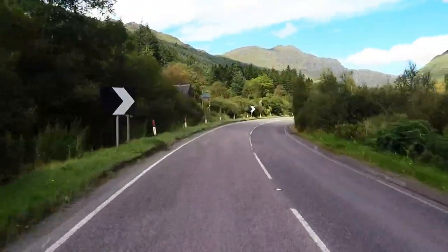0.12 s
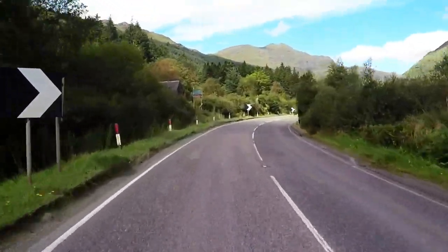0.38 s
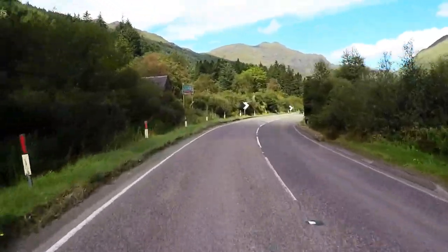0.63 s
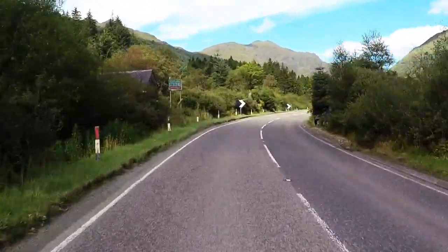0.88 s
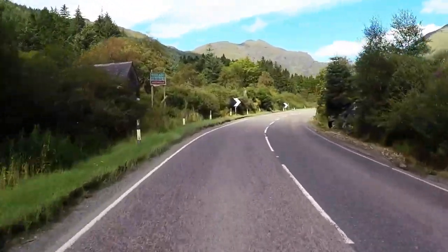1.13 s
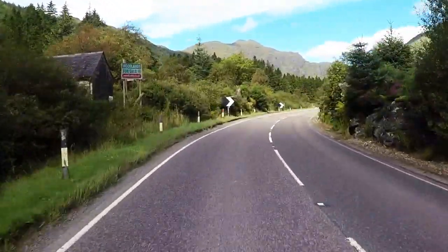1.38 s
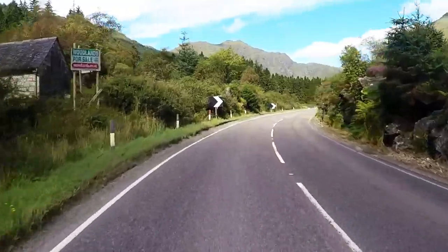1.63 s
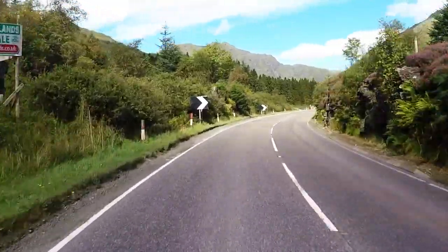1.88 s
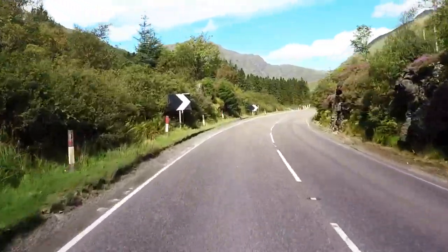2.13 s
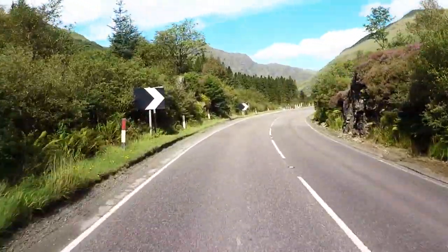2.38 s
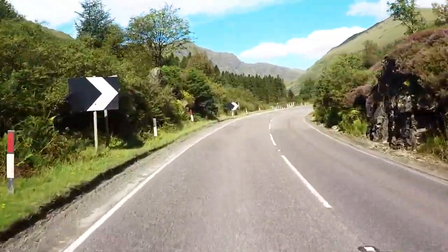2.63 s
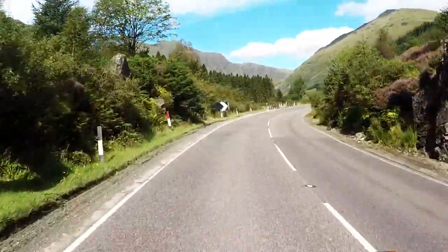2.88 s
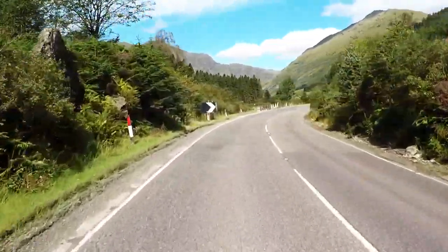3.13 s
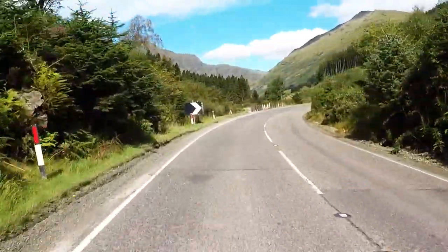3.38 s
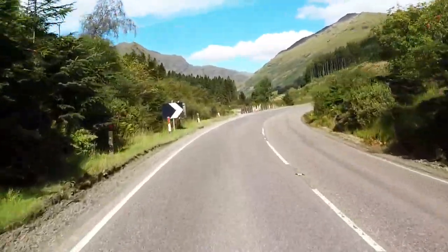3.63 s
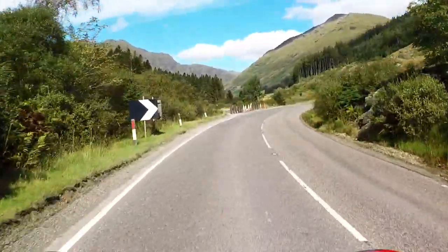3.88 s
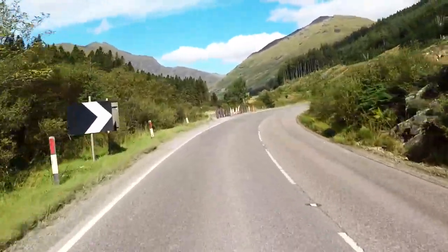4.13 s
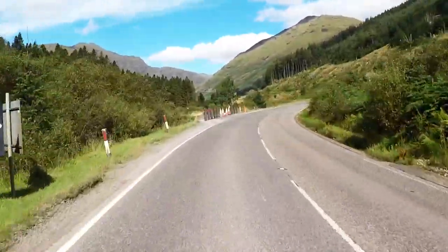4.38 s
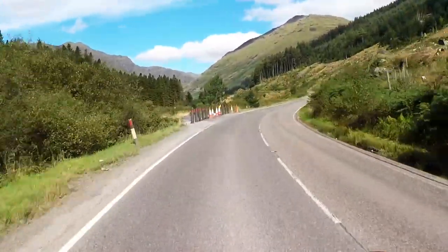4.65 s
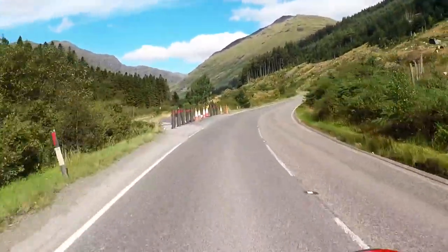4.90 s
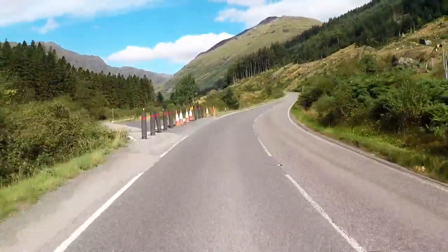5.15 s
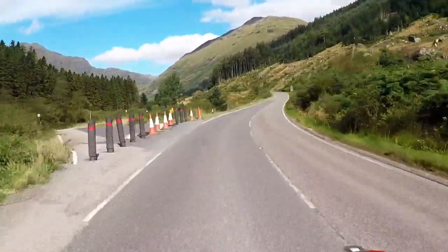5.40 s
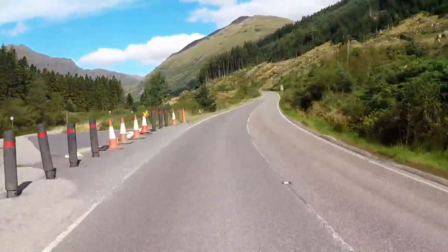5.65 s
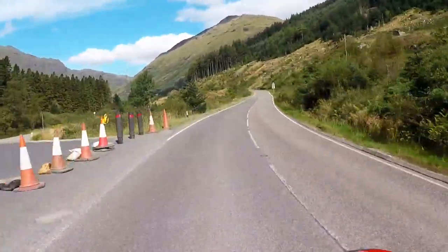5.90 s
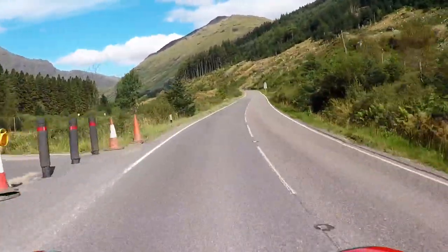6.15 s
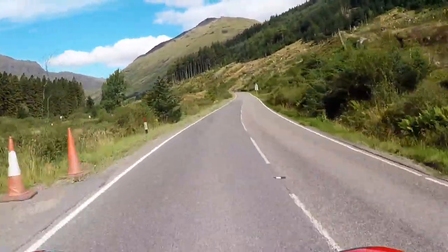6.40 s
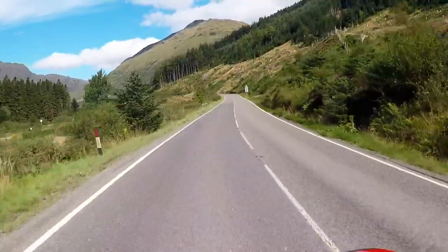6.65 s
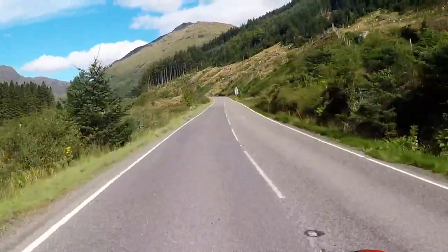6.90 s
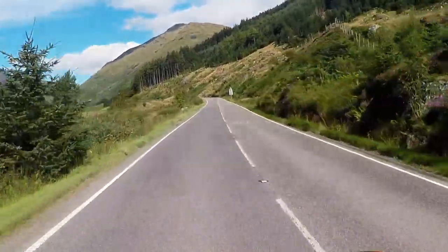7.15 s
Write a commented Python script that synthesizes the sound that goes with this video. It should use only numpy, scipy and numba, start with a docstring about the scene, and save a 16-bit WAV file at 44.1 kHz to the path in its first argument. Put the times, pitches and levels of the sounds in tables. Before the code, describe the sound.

Wind overload from start to finish: deep, uneven thumps push the microphone close to distortion, and brief tearing bursts crack through, some followed by a sucking low pulse. Tyre roar is buried in the dull rush beneath. Fine crackle and weak hiss add grit. The car moves steadily outdoors; the close, mono sound is squeezed in level, with a rougher, fuller second half.

```python
"""Wind on an open car

A small camera rides on an open car along a country road, its microphone in the full airstream.
Big eddies thump the diaphragm as low noise; small ones tear past the port as short ripping noise bursts,
the strongest with a snap and a pull of suction. The port hisses and tiny ticks make the rush gritty.
Tyre roar shares the rushing noise underneath, and a quick gain control holds the loud moments down."""
import sys
import numpy as np
from scipy import signal
from scipy.fft import rfft, irfft, next_fast_len
from scipy.io import wavfile
from scipy.ndimage import uniform_filter1d
from numba import njit

SR = 44100
rng = np.random.default_rng(int(sys.argv[2]) if len(sys.argv) > 2 else 0)


def undo_db(level):
    """Turn decibels back into plain size, where 20 dB means ten times bigger."""
    steps = np.asarray(level, float) / 20
    return 10 ** steps


def output_pcm(signal):
    """Save a mono or channel-first signal as 16-bit PCM at the path in sys.argv[1].

    Samples are clipped to [-1, 1] before scaling.
    """
    pcm = np.clip(np.atleast_2d(signal).T, -1, 1) * 32767
    wavfile.write(sys.argv[1], SR, np.round(pcm).astype(np.int16))


N = 320607
TIME = np.arange(N) / SR


def level(x, db):
    """Scale to an rms level in dB."""
    return x * undo_db(db) / np.sqrt(np.mean(x ** 2))


def noise(colour):
    """Noise of rms 1 whose spectrum runs through (Hz, dB) points."""
    hz, db = np.transpose(colour)
    size = next_fast_len(N)
    log_hz = np.log(np.arange(size // 2 + 1) * SR / size + 1)
    gain = undo_db(np.interp(log_hz, np.log(hz), db))
    return level(irfft(rfft(rng.standard_normal(size)) * gain, size)[:N], 0)


def walk(rate_hz):
    """Random levels held for 1 / rate_hz seconds, then smoothed twice; rms 1."""
    hold = int(SR / rate_hz)
    steps = np.repeat(rng.standard_normal(N // hold + 1), hold)
    return level(uniform_filter1d(uniform_filter1d(steps, hold), hold)[:N], 0)


def octaves(x, wander_db, low_hz, count):
    """Split into crossfading octave bands; each takes the dB curve that wander_db(octave) gives it."""
    size = next_fast_len(N)
    hz = np.arange(size // 2 + 1) * SR / size + 1
    place = np.clip(np.log2(hz / low_hz), 0, count - 1)
    spectrum = rfft(x, size)
    out = np.zeros(N)
    for k in range(count):
        band = irfft(spectrum * np.clip(1 - abs(place - k), 0, 1), size)[:N]
        out += undo_db(wander_db(k)) * band
    return out


def steady(x, share, span_s):
    """Even out the chance swells of a noise by a share of 0-1."""
    span = int(span_s * SR)
    power = uniform_filter1d(uniform_filter1d(x ** 2, span), span)
    return x * (x.std() / np.sqrt(power + 1e-9)) ** share


def puffs(rows, rise_s):
    """Envelope of (start s, dB, length s) puffs: a quick rise, a short hold, a soft end."""
    out = np.zeros(N)
    for s, db, length in rows:
        t = np.arange(int(3 * length * SR) + 2) / SR
        start = max(int((s - rise_s) * SR), 0)
        shape = undo_db(db) * (1 - np.exp(-t / rise_s)) * np.exp(-(t / length) ** 2)
        out[start:start + len(t)] += shape[:N - start]
    return out


def snaps(s, db, hz):
    """The front of an eddy kicks the diaphragm: one short damped swing, in or out."""
    kicks = np.zeros(N)
    kicks[(s * SR).astype(int)] = undo_db(db) * rng.choice([-1, 1], len(s))
    t = np.arange(400) / SR
    ring_s = 0.4 / hz  # the swing fades within about a cycle
    swing = np.sin(2 * np.pi * hz * t) * t / ring_s * np.exp(1 - t / ring_s)
    return signal.fftconvolve(kicks, swing)[:N]


# Colour of turbulence and tyre roar. Each row: frequency in Hz, relative density in dB per Hz.
RUSH_COLOUR = [(88, -35.5), (150, -9.5), (216, -9), (574, -18), (1100, -20), (1620, -22), (2300, -28),
               (3000, -38.5), (3900, -55.5), (6600, -120)]


def rush(db, surge_db):
    """Turbulence and tyre roar: octaves share the surges of the stream and flicker alone."""
    surge_share = (0.95, 1.0, 1.0, 0.56, 0.056)
    swell_share = (1.2, 1.2, 1.1, 0.93, 0.15)  # the lower octaves swell most
    flicker_db = 1.8  # each octave's own quick wavering

    def wander_db(k):
        swell_db = swell_share[k] * (db - db.mean())
        return swell_db + surge_share[k] * surge_db + flicker_db * walk(45)

    return undo_db(db.mean() + 0.3) * octaves(noise(RUSH_COLOUR), wander_db, 210, count=5)


# Colour of the air at the port. Each row: frequency in Hz, relative density in dB per Hz.
HISS_COLOUR = [(1650, -26.5), (2800, -3), (4060, 1.5), (5020, -1.5), (6760, -12), (9050, -25),
               (9960, -30.5), (12900, -54), (21900, -120)]


def hiss(db, surge_db):
    """Air whistling broadly over the port, lifted a little by every surge."""
    air = octaves(noise(HISS_COLOUR), lambda k: 0.32 * surge_db + 1.13 * walk(30), 3600, count=2)
    return undo_db(db) * level(air, 0)


# Pitches of the tiny ticks. Each entry: frequency of the damped swing in Hz.
TICK_HZ = (650, 1000, 1500, 2000)


def crackle(rush_db):
    """Thousands of the tiniest eddies tick past the port: the smaller, the higher and weaker the tick."""
    scatter_db, most_db = 3.5, 9  # level over the rush: mean before the cap, and the cap
    chance = rng.random((2500, 2)).T
    s = chance[0] * (N - 1) / SR
    over_db = np.minimum(-scatter_db * np.log(1 - chance[1]), most_db)
    db = np.interp(s, TIME, rush_db) + over_db
    out, kinds = np.zeros(N), len(TICK_HZ)
    for k, hz in enumerate(TICK_HZ):
        out += TICK_HZ[1] / hz * snaps(s[k::kinds], db[k::kinds], hz)
    return out


# Colour of the large eddies. Each row: frequency in Hz, relative density in dB per Hz.
BUFFET_COLOUR = [(8.8, -38), (15, -0.5), (38, 3.5), (80, 0.5), (117, -1), (166, -12), (300, -20.5),
                 (390, -25), (660, -120)]


def buffet(db, flutter_db):
    """Large eddies push the diaphragm to and fro; its travel stiffens at the ends."""
    push = octaves(noise(BUFFET_COLOUR), lambda k: k * flutter_db, 80, count=2)
    # the largest vortices are shed one after another at a nearly even size
    deep = signal.sosfiltfilt(signal.butter(2, 42, fs=SR, output="sos"), push)
    push = steady(push - deep, 0.3, 0.12) + steady(deep, 0.39, 0.034)
    stiffness = 0.155
    return undo_db(db) * level(np.tanh(push * stiffness), 0)


def suction(s, db, lag_s):
    """Behind each strong eddy the pressure drops sharply, then swings back slowly."""
    pull_db, most_db = 13, -2  # pull over the eddy's tearing, and its ceiling
    width_s, rebound_share = 0.0017, 0.62
    deepest_s = s + lag_s * rng.uniform(0.7, 1.3, len(s))
    kicks = np.zeros(N)
    kicks[((deepest_s - 3 * width_s) * SR).astype(int)] = undo_db(np.minimum(db + pull_db, most_db))
    t = np.arange(2000) / SR / width_s - 3  # in widths from the deepest pull
    pull = np.exp(-t ** 2 / 2)
    back = np.maximum(t - 1, 0) / 2.5
    rebound = rebound_share * back * np.exp(1 - back ** 1.5)
    return signal.fftconvolve(kicks, rebound - pull)[:N]


def faint_eddies(rush_db):
    """Envelope of a dense stream of fainter eddies that follows the rush."""
    count = 700
    chance = rng.random((count, 3)).T
    when = (np.arange(count) + 2 * chance[0]) / (count + 2) * N / SR
    size_db = np.interp(when, TIME, rush_db) + 3.0 + 7 * chance[1] ** 2
    length_s = 0.003 + 0.006 * chance[2]
    return puffs(zip(when, size_db, length_s), 0.0014)


# Colour of the ripping air. Each row: frequency in Hz, relative density in dB per Hz.
RIP_COLOUR = [(50, -6.5), (130, 20.5), (400, 3.5), (1000, -14), (2000, -24.5), (2900, -39), (4500, -38.5),
              (9000, -70)]
# The strongest small eddies. Each row: start in seconds, level in dB of the tearing (above about 700 Hz),
# level in dB of the thud below it relative to the tearing, length of the thud in seconds.
STRONG_EDDIES = [(0.129, -21, 7, 0.013), (0.31, -19.5, 4.5, 0.0073), (0.326, -11.5, 1, 0.011),
                 (0.403, -12.5, -7.5, 0.0063), (0.429, -25.5, -9, 0.039), (0.481, -21.5, 4, 0.013),
                 (0.66, -26.5, -12, 0.02), (0.698, -24, -7, 0.01), (0.745, -11, -9, 0.012),
                 (0.779, -24.5, -14, 0.018), (0.828, -18.5, 0, 0.012), (0.883, -20.5, 0, 0.005),
                 (1.087, -14.5, 4, 0.016), (1.114, -12.5, 0.5, 0.014), (1.179, -20.5, 0, 0.011),
                 (1.23, -26, -11, 0.036), (1.311, -21, 1.5, 0.036), (1.394, -15.5, -5.5, 0.0069),
                 (1.439, -15.5, -7, 0.0071), (1.582, -23, 2, 0.051), (1.639, -22.5, 5, 0.016),
                 (1.875, -12, -1, 0.0072), (1.979, -19.5, -11, 0.0084), (2.049, -21, 2, 0.015),
                 (2.103, -18, 0, 0.017), (2.132, -12.5, 2, 0.006), (2.195, -16, 2.5, 0.013),
                 (2.273, -19.5, -2.5, 0.01), (2.289, -15, 7.5, 0.017), (2.325, -10, 8, 0.0052),
                 (2.378, -23.5, -7, 0.018), (2.476, -12.5, -2, 0.011), (2.646, -14, 8.5, 0.0068),
                 (2.695, -22, 5, 0.038), (2.762, -14, 0.5, 0.014), (2.857, -18, 0, 0.0066),
                 (2.884, -18.5, -3, 0.019), (2.928, -23.5, 0, 0.017), (3.066, -25.5, -12, 0.032),
                 (3.201, -18.5, 5, 0.016), (3.236, -11.5, -1.5, 0.015), (3.363, -15, -3, 0.022),
                 (3.671, -13.5, 4, 0.011), (3.819, -16, -13, 0.0072), (3.883, -24, -11, 0.0045),
                 (3.911, -27.5, -14, 0.022), (3.958, -22, -35, 0.015), (4.017, -14.5, -12, 0.0061),
                 (4.311, -13.5, -4, 0.007), (4.484, -27, 0, 0.018), (4.591, -11.5, -5, 0.01),
                 (4.663, -20, -3, 0.01), (4.673, -22.5, -8, 0.0058), (4.7, -11.5, -5.5, 0.014),
                 (4.732, -9.5, -3.5, 0.0022), (4.798, -23.5, -3, 0.01), (4.812, -25.5, 1, 0.02),
                 (4.837, -22, -4, 0.0085), (4.863, -17.5, -1, 0.008), (4.918, -22, -3, 0.015),
                 (4.963, -13.5, 0.5, 0.0072), (5.11, -18.5, 6, 0.02), (5.164, -20.5, -9.5, 0.039),
                 (5.257, -19, -9, 0.015), (5.442, -25, -3, 0.016), (5.623, -10, -0.5, 0.0085),
                 (5.679, -13, -1.5, 0.013), (5.762, -19.5, -14, 0.016), (5.816, -23, 16, 0.011),
                 (5.869, -23, 4.5, 0.028), (5.902, -25.5, 13.5, 0.018), (6.011, -21, -7.5, 0.016),
                 (6.034, -16, 5, 0.016), (6.182, -13, 2, 0.008), (6.313, -13.5, -7, 0.013),
                 (6.434, -17, -20, 0.0092), (6.53, -8.5, 4.5, 0.0051), (6.71, -16, 5.5, 0.014),
                 (6.879, -15.5, -1.5, 0.021), (6.955, -13.5, -6, 0.0097), (6.989, -14, 4.5, 0.018)]
SUCTION_LAG_S = 0.006


def eddies(rush_db):
    """Each small eddy tears over a duller thud; the strong ones add a snap, and suction behind."""
    tear_share, tear_rise_s = 0.85, 0.0012  # tearing length as a share of the thud's
    crisp_per_thud, crisp_most_db = 0.3, 4  # dB of treble gained per dB of thud below the tearing
    s, db, thud_db, length = np.transpose(STRONG_EDDIES)
    faint = faint_eddies(rush_db)

    torn = noise(RIP_COLOUR)
    dull = signal.sosfiltfilt(signal.butter(1, 700, fs=SR, output="sos"), torn)
    sharp = level(steady(torn - dull, 1.0, 0.0019), 0)
    treble = signal.sosfiltfilt(signal.butter(2, [1500, 2900], "band", fs=SR, output="sos"), sharp)
    thud = level(steady(dull, 0.56, 0.028), 0)

    crisp_db = np.clip(-crisp_per_thud * thud_db, -crisp_most_db, crisp_most_db)
    tear_s = tear_share * length
    thud_shape = puffs(zip(s, db + thud_db, length), 0.002) + undo_db(1.0) * faint
    tear_shape = puffs(zip(s, db, tear_s), tear_rise_s) + undo_db(-4.0) * faint
    treble_shape = puffs(zip(s, db + crisp_db, tear_s), tear_rise_s) + undo_db(-1.0) * faint
    burst = thud * thud_shape + (sharp - treble) * tear_shape + treble * treble_shape
    return burst + undo_db(1) * snaps(s, db, hz=900) + suction(s, db, SUCTION_LAG_S)


def lull_db():
    """The rush slackens for a moment in the calm wake of each strong eddy."""
    depth_db, lag_s, length_s = -3, 0.013, 0.02
    wakes = puffs([(s + lag_s, 0, length_s) for s, *_ in STRONG_EDDIES], 0.003)
    return depth_db * np.minimum(wakes, 1)


def buffet_dip_db():
    """The buffeting is turned down briefly at each strong eddy, so that its suction stands out."""
    dips = puffs([(s, 0, 2 * SUCTION_LAG_S) for s, *_ in STRONG_EDDIES], 0.002)
    return -5 * np.minimum(dips, 1)


# The airstream swells and slackens. Each row: time in seconds, turbulent rush in dB before its octaves
# are weighted, port hiss in dB.
AIRSTREAM = [(0.0, -31.5, -41), (0.251, -35, -40.5), (0.37, -27.5, -39.5), (0.55, -34, -42),
             (0.68, -30, -39), (0.99, -27.5, -38.5), (1.48, -30, -42.5), (1.94, -30.5, -43),
             (2.0, -26, -38.5), (2.06, -28, -42), (2.297, -29.5, -40.5), (2.45, -31, -44.5),
             (2.69, -31.5, -43), (2.969, -33, -42.5), (3.12, -27, -41), (3.28, -29.5, -39.5),
             (3.48, -28, -42.5), (3.698, -31.5, -38.5), (3.91, -34, -43), (4.231, -33, -42.5),
             (4.29, -31.5, -40.5), (4.347, -26.5, -38), (4.471, -23.5, -40.5), (4.559, -25.5, -39.5),
             (4.64, -32.5, -41.5), (4.76, -23.5, -39.5), (4.858, -25.5, -39), (4.95, -28, -39),
             (5.2, -28.5, -41.5), (5.34, -31.5, -41.5), (5.45, -25.5, -39.5), (5.56, -29, -40),
             (5.63, -29.5, -39.5), (5.69, -26, -35), (5.81, -25.5, -39.5), (6.1, -27, -37.5),
             (6.19, -32.5, -41.5), (6.229, -23.5, -35.5), (6.44, -26, -38), (6.84, -29, -37.5),
             (7.23, -30.5, -43), (7.27, -27, -40.5)]


def scene():
    """All wind layers at the one microphone; the buffeting leans on the rush and wanders by itself."""
    s, *columns = np.transpose(AIRSTREAM)
    rush_db, hiss_db = (np.interp(TIME, s, c) for c in columns)
    buffet_db = -10.5 + 0.32 * (rush_db - rush_db.mean()) + 0.36 * walk(60) + buffet_dip_db()
    surge_db = 0.9 * walk(24) + 3.2 * walk(55)  # slow and quick surges
    flutter_db = -0.5 * walk(7.1)
    rush_db = rush_db + lull_db()
    thumps = buffet(buffet_db, flutter_db)
    roar = rush(rush_db, surge_db)
    rips = eddies(rush_db)
    ticks = crackle(rush_db)
    whistle = hiss(hiss_db, surge_db)
    return (thumps + roar + rips + ticks + whistle)[None]


@njit
def follow(x, attack, release, start):
    """Envelope that rises fast and falls slowly."""
    out, e = np.empty(len(x)), start
    for i in range(len(x)):
        e += (abs(x[i]) - e) * (attack if abs(x[i]) > e else release)
        out[i] = e
    return out


def low_pass(x):
    """Removes everything above the highest recorded frequency."""
    return signal.sosfilt(signal.butter(12, 10110, fs=SR, output="sos"), x)


def record(dry, top=0.35, ratio=1.87, attack_s=0.0061, release_s=0.084):
    """Quick gain control ducks the loud and lifts the quiet a little; the converter rounds the peaks."""
    envelope = follow(dry[0], 1 / (attack_s * SR), 1 / (release_s * SR), top)
    gain = np.minimum(top / envelope, 1.5) ** (1 - 1 / ratio)
    held = dry * gain * undo_db(-0.09)
    rounded = held / (1 + abs(held) ** 4) ** 0.25
    return low_pass(rounded)


dry = scene()
out = record(dry)
output_pcm(out)
```